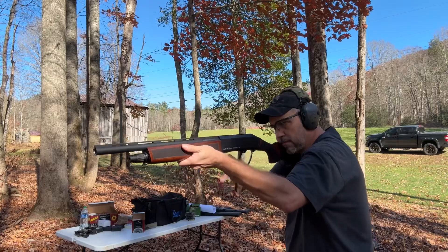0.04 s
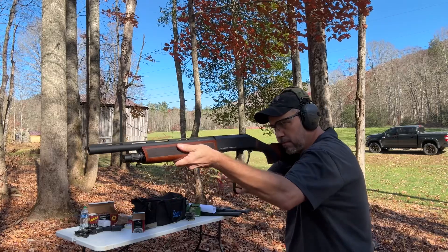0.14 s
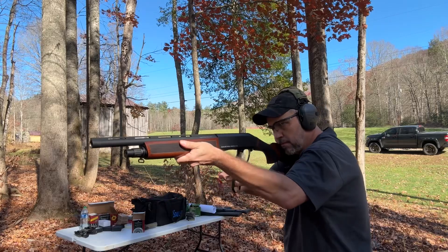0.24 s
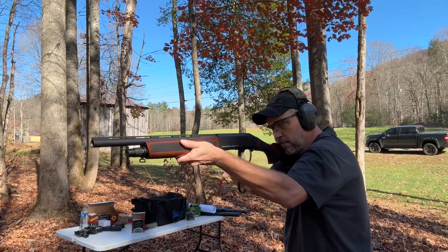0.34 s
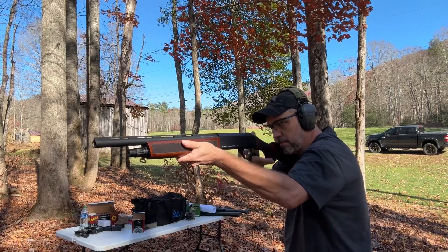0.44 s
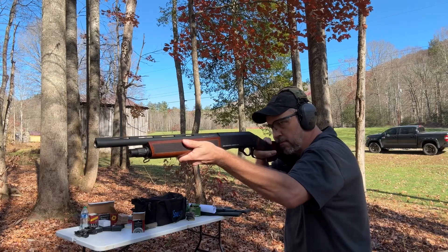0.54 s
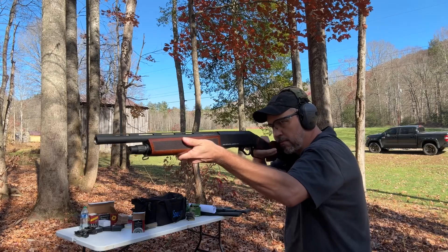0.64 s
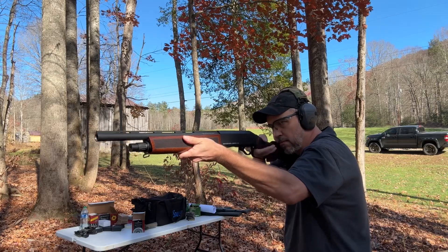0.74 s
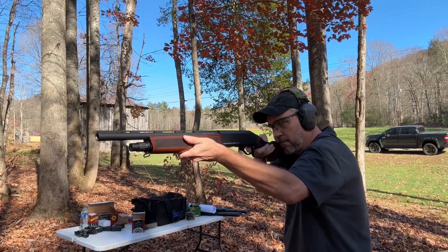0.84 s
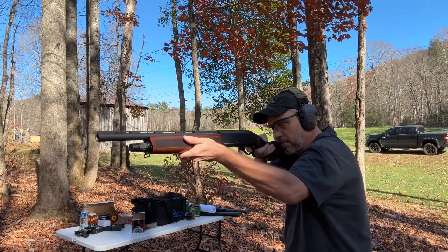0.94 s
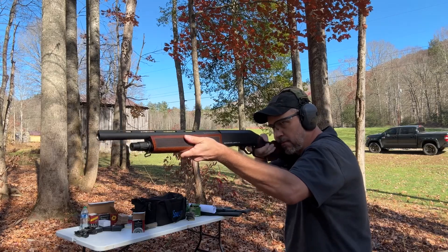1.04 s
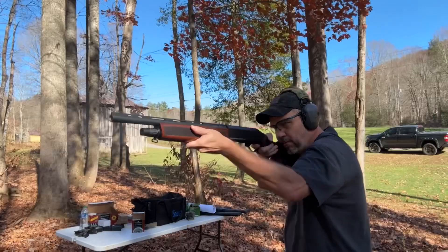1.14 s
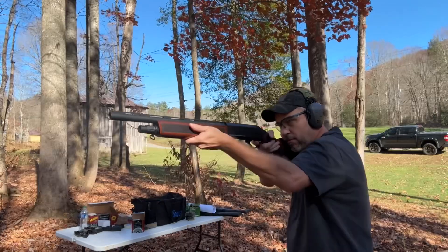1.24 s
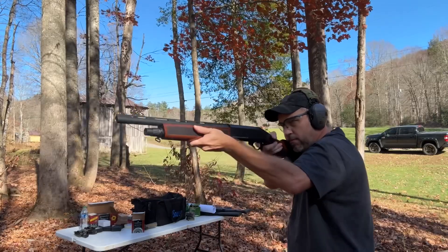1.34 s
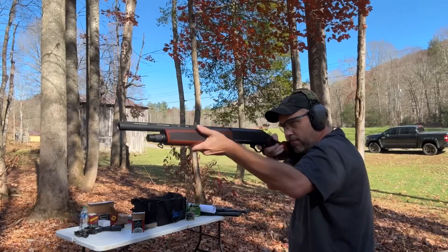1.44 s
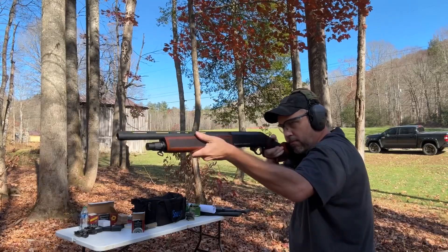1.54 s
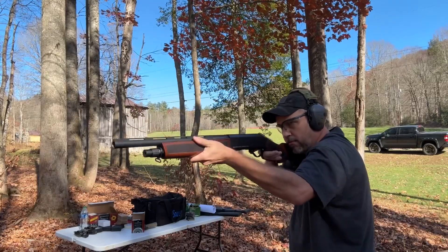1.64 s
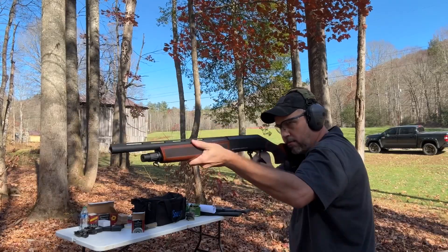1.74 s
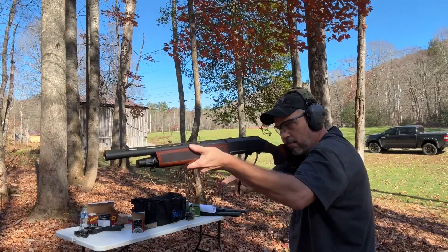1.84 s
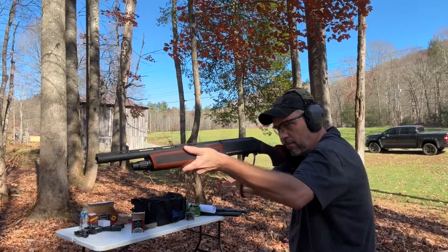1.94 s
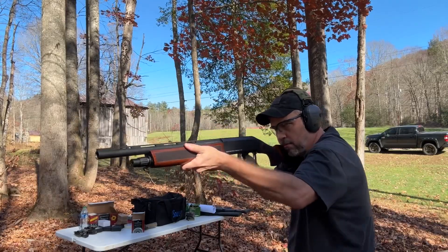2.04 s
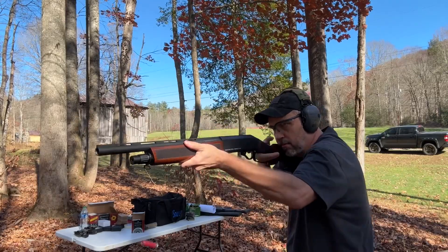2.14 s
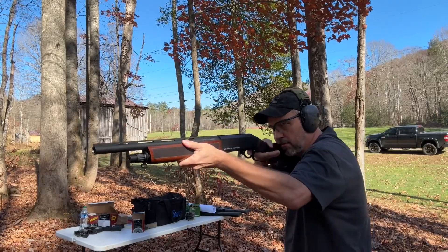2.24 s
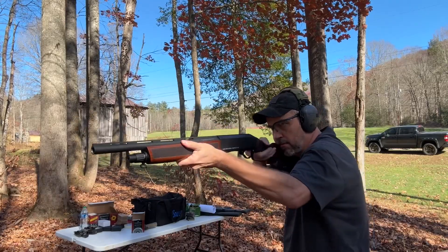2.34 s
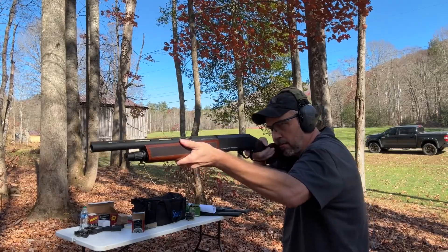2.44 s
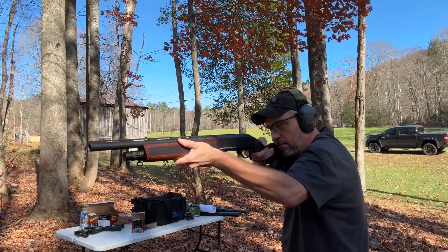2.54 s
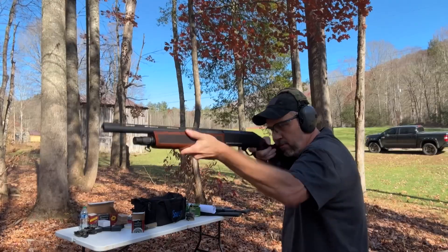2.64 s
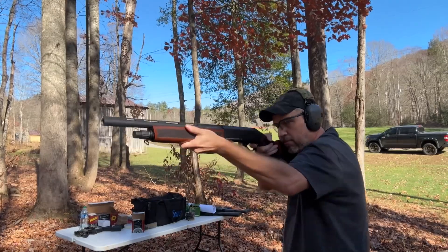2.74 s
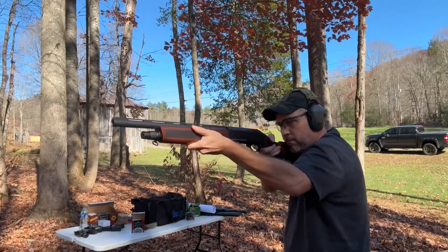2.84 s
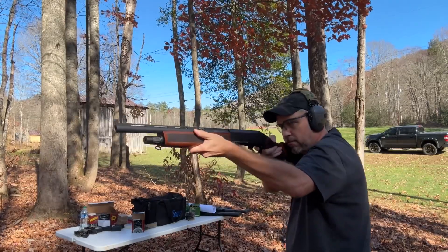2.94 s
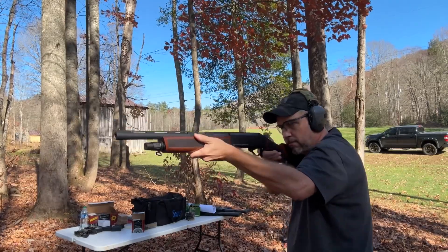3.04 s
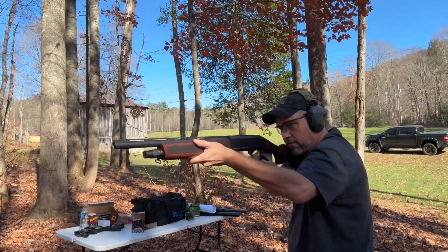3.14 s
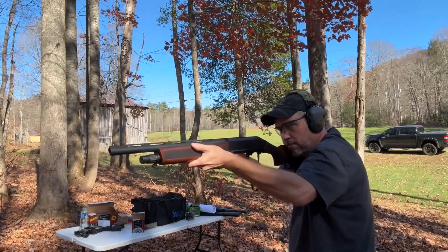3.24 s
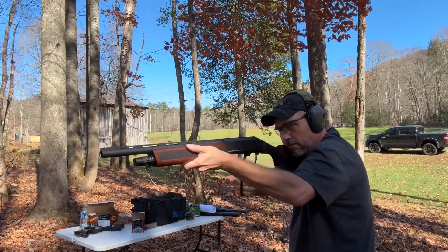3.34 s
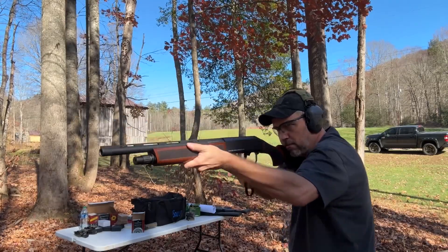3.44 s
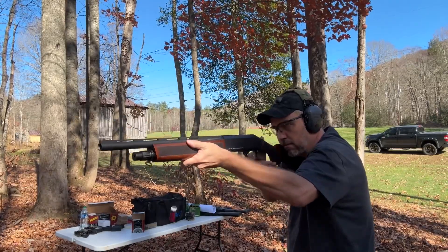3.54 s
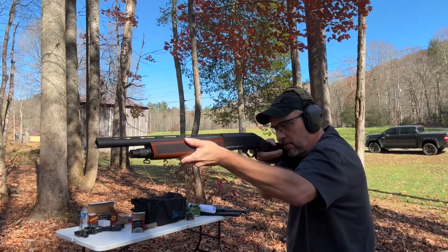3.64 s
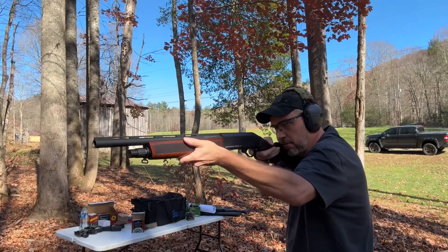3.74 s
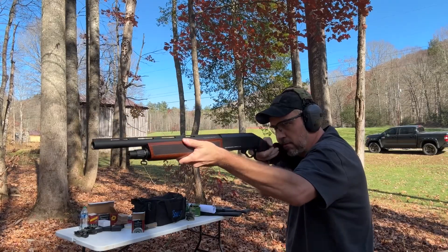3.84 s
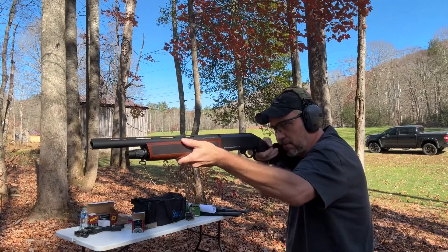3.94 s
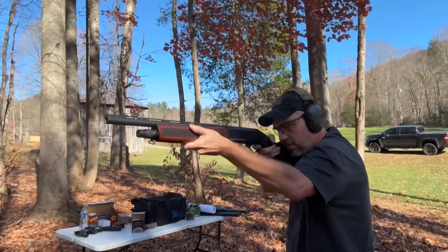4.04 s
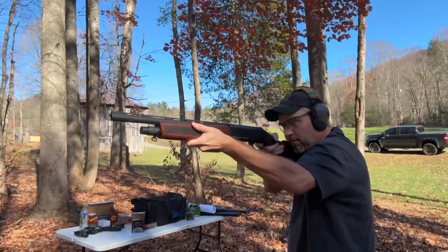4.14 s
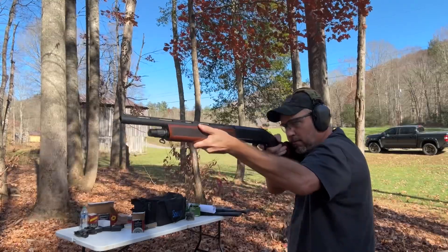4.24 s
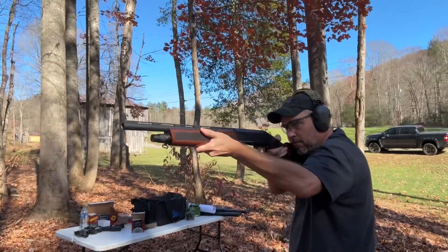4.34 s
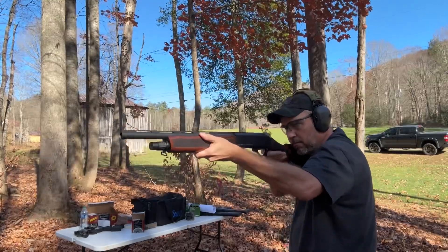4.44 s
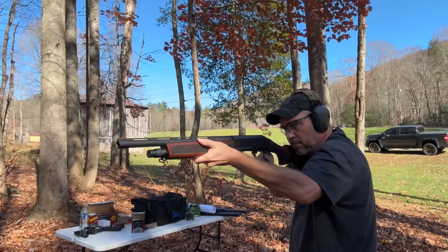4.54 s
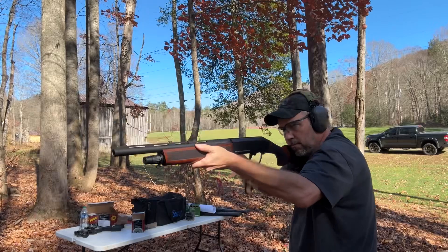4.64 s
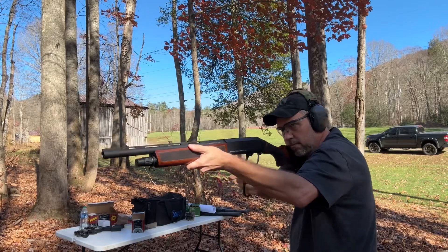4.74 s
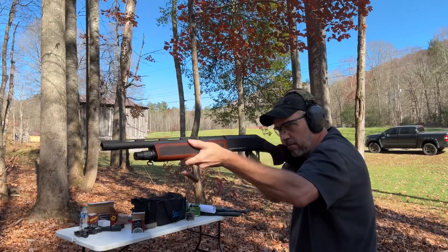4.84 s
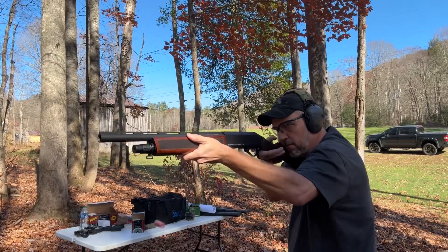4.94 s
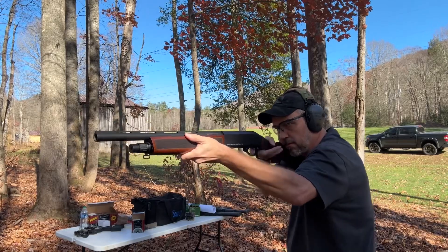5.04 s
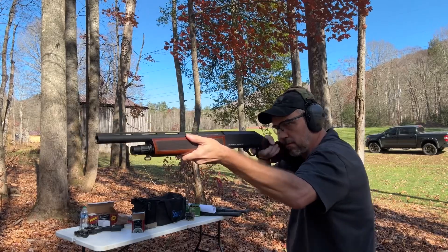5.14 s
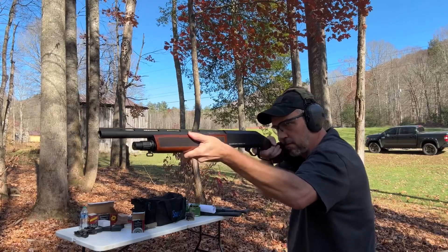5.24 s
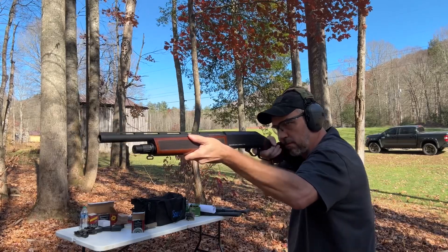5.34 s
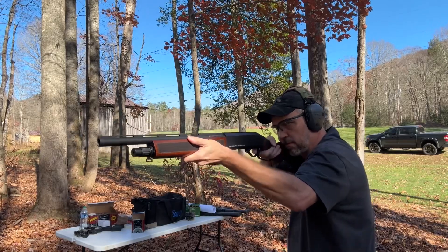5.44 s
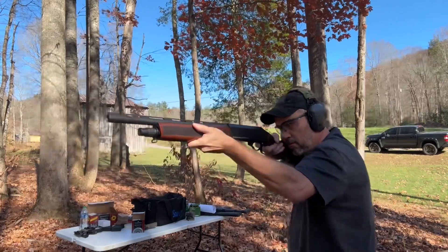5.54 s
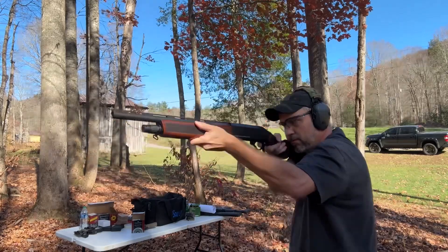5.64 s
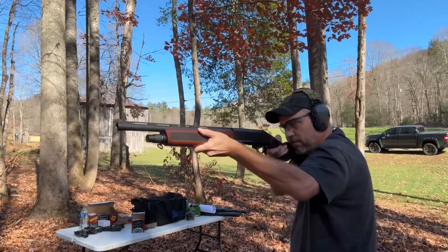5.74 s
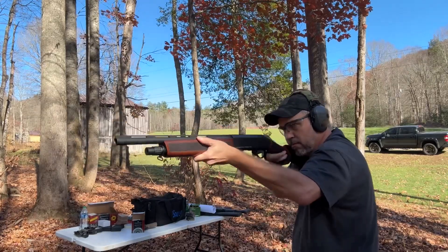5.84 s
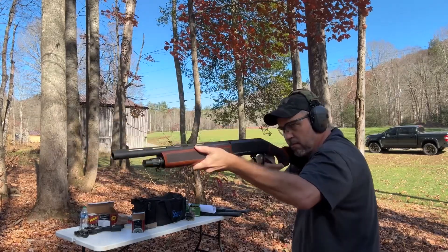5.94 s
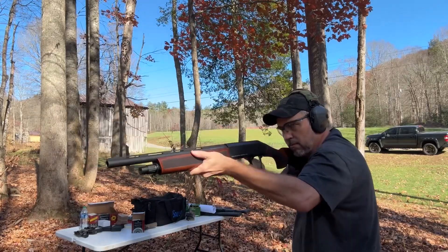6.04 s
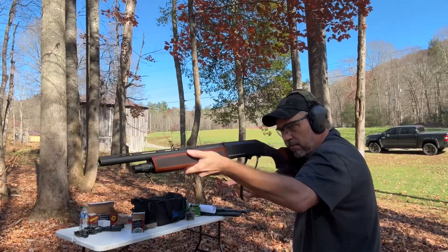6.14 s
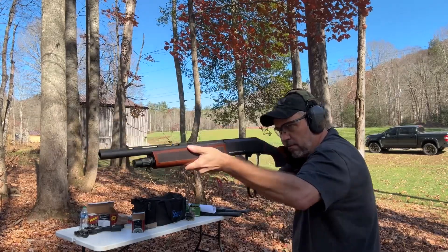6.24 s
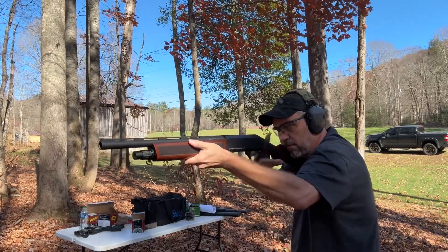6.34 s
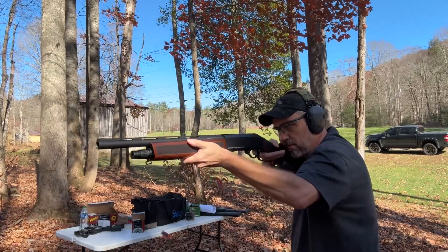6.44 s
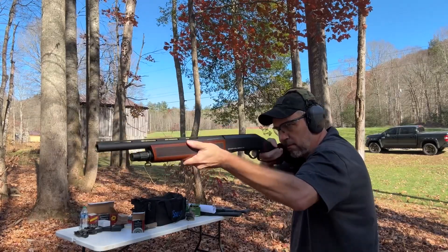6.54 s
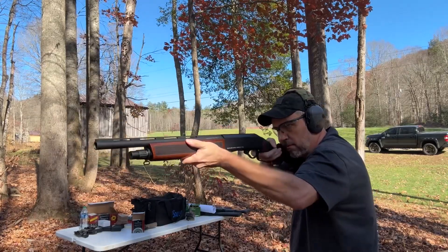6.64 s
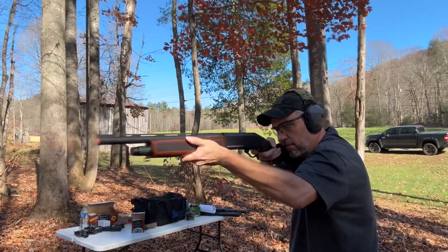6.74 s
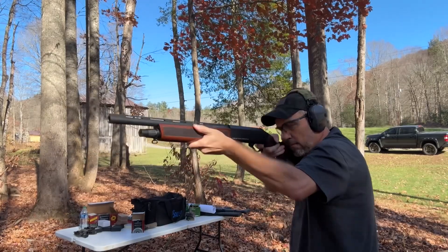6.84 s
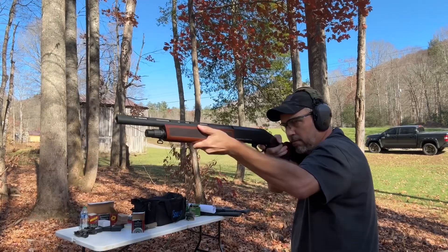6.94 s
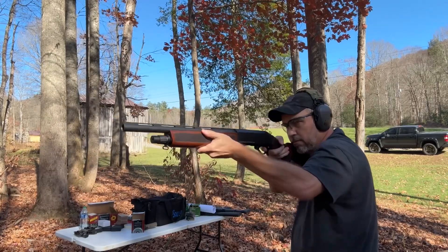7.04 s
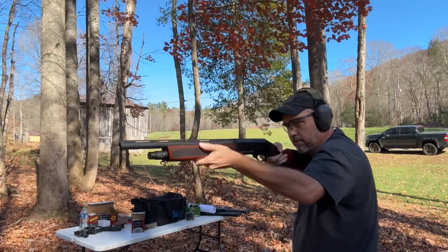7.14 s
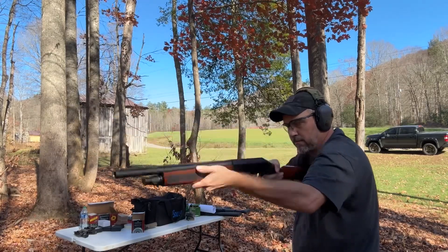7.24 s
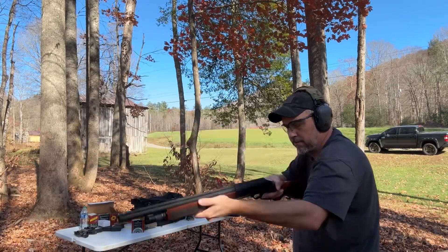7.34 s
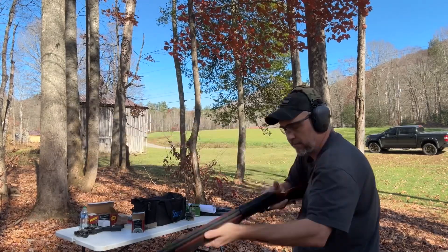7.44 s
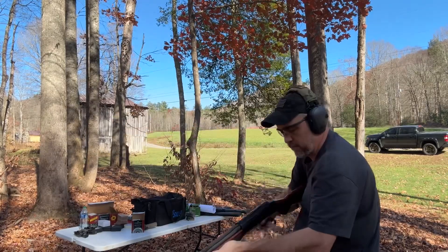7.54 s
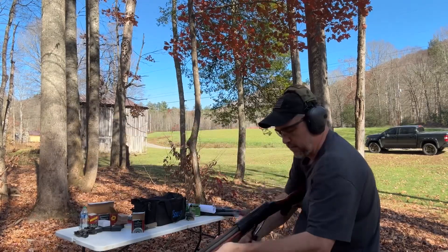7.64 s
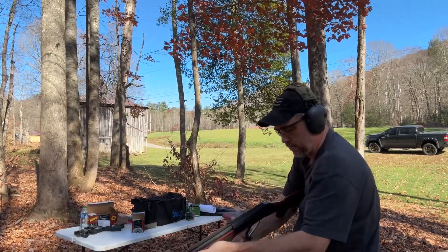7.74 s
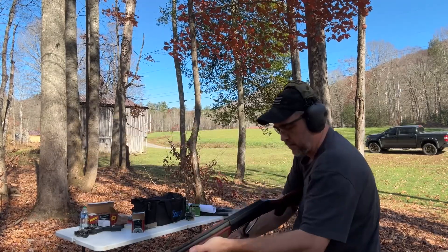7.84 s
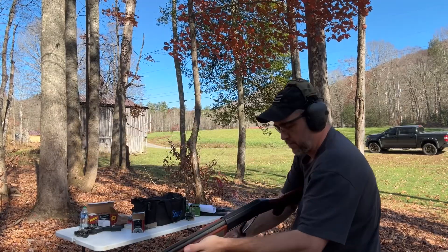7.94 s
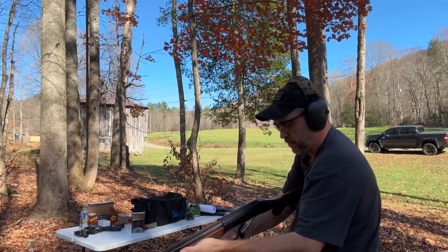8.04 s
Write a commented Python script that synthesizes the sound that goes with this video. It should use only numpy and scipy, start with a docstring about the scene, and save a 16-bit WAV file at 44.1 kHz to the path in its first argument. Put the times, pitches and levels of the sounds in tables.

```python
"""Five close shotgun blasts among bare trees at the edge of a valley, each with slaps, low throbs and a far roll.
Between shots a lever throws the bolt open and slams it shut; a steel part rings on after the slam.
Blasts are shaped noise with a low gliding tone, the throbs a wavering tone; the action is ticks, decaying modes
and rattle; the ring is two sine modes; growl, hiss and still air are modulated noise.
Everything but the ring and the low throb reaches two close microphone ports, partly alike and out of phase."""
import sys
import numpy as np
from scipy import signal
from scipy.fft import rfft, irfft, next_fast_len
from scipy.io import wavfile
from scipy.ndimage import uniform_filter1d, map_coordinates

SR = 44100
rng = np.random.default_rng(int(sys.argv[2]) if len(sys.argv) > 2 else 0)


def amplitude_ratio(level_db):
    """Convert a level in decibels to the matching linear amplitude (field) ratio."""
    exponent = np.asarray(level_db, float) / 20
    return 10 ** exponent


def generate_wav(signal):
    """Clip the signal to [-1, 1] and save it as 16-bit WAV at the path in sys.argv[1]."""
    frames = np.transpose(np.atleast_2d(signal))
    scaled = np.clip(frames, -1, 1) * 32767
    pcm = np.round(scaled).astype(np.int16)
    wavfile.write(sys.argv[1], SR, pcm)


N = 356442

# shots: t/s, pre-echo level just before the crack/dB, pre-echo rise per 60 dB/s, silent gap/s,
# crack level/dB, far echo level/dB, far echo slope/(dB/s)
SHOTS = [(1.131, -2.5, 0.023, 0.0048, -14.5, -10.5, 12), (2.634, -16.5, 0.13, 0.00026, -12, -1.5, 3),
         (3.999, -22, 0.061, 0.0013, -13, 0.6, -1), (5.4942, -27, 0.078, 0.00055, -17.5, 2.1, 0),
         (6.7776, -21, 0.033, .0005, -13.5, 2.56, -3.5)]
# blasts and valley at the two ports: f/Hz, likeness/0-1
ECHO_ALIKE = [(60, 0.75), (350, 0.8), (1000, 0.52), (2000, 0.099), (7500, 0.08), (8900, 0.91),
              (17000, 0.98)]
# blasts and valley at the two ports: f/Hz, left lead/rad
ECHO_LEAD = [(0, 0), (350, 1.5), (1000, 3.1), (3000, 6), (7000, 6.2), (9000, 9.38), (9900, 9.46),
             (11300, 12.52), (13000, 12.6), (14200, 15.66), (18000, 15.74)]


def unit(x):
    """Scales to rms 1."""
    return x / np.sqrt(np.mean(x ** 2) + 1e-20)


def along(points, hz):
    """Interpolates (f/Hz, value) points on a log frequency axis."""
    f, v = np.transpose(points)
    return np.interp(np.log(hz + 1), np.log(f + 1), v)


def level(tables):
    """Sums gains per sample from (t/s, level/dB) tables, each at -120 dB outside its span."""
    t = np.arange(N) / SR
    return sum(amplitude_ratio(np.interp(t, *np.transpose(rows), left=-120, right=-120)) for rows in tables)


def wobble(rate_hz):
    """Smooth random curve through rate_hz knots a second."""
    knots = rng.standard_normal(int(N * rate_hz / SR) + 4)
    return map_coordinates(knots, [np.arange(N) * rate_hz / SR])


def filtered(x, response):
    """Multiplies the spectrum of x by a function of frequency."""
    m = next_fast_len(x.shape[-1] + 8192)
    shaped = rfft(x, m) * response(np.fft.rfftfreq(m, 1 / SR))
    return irfft(shaped, m)[..., :x.shape[-1]]


def noise(spectrum, size=N):
    """Two unrelated coloured noises, rms 1 overall."""
    white = rng.standard_normal((2, size))
    return unit(filtered(white, lambda hz: amplitude_ratio(along(spectrum, hz))))


def ports(pair, alike, lead):
    """Mixes two unrelated signals into what two close ports hear: likeness and phase vary with frequency."""
    def same(hz):
        return np.clip(along(alike, hz), 0, 1)

    shared = filtered(pair[0], lambda hz: same(hz) * np.exp(-1j * np.interp(hz, *np.transpose(lead))))
    unshared = filtered(pair[1], lambda hz: np.sqrt(1 - same(hz) ** 2))
    return np.array([pair[0], shared + unshared])


def add(track, start_s, sound):
    """Mixes a sound into the track at start_s."""
    part = track[:, round(start_s * SR):][:, :sound.shape[1]]
    part += sound[:, :part.shape[1]]


def fade(t, t60):
    """Silence before 0, then an exponential fall of 60 dB per t60."""
    return (t >= 0) * amplitude_ratio(-60 * np.maximum(t, 0) / t60)


def shots():
    """Pre-echo noise smeared ahead of the crack, the crack, slaps off near trunks, then woods noise dying away."""
    # nearest trunks and ground: delay/s, level re crack/dB, t60/s
    trunks = [(.004, 0.5, 0.026), (.012, -8, .04), (0.038, -2.5, .04), (.058, -11, .05),
              (0.084, -26.5, .05), (.135, -48, 0.067)]
    # pre-echo spectrum: f/Hz, density/dB
    pre_echo = [(150, -9), (500, 0.5), (2500, -6), (8000, -14), (8800, -47.5)]
    # first milliseconds of the crack: f/Hz, density/dB
    snap = [(500, -21), (2000, 3), (6000, -4), (13000, 0), (16800, 0.5), (17600, -61.5)]
    # crack and slaps: f/Hz, density/dB
    crack = [(60, -26), (110, 5), (430, -5), (1500, -9.5), (4500, -20.5), (9500, -24), (13000, -33),
             (15500, -30), (17000, -72)]
    # woods spectrum: f/Hz, density/dB
    woods = [(40, -31), (75, -9), (120, -9), (230, -14), (460, 0.5), (940, -11.5), (4200, -20), (8200, -26),
             (12500, -26), (15600, -36.5), (16300, -66), (17000, -100)]
    # woods decay: f/Hz, t60 before the stretch/s
    woods_t60 = [(80, 0.24), (250, 0.73), (600, 0.57), (1500, 0.46), (3000, 0.44), (6000, 0.42),
                 (12000, 0.31)]
    woods_db, woods_t60_stretch = -16.5, 1.202

    out, t = np.zeros((2, N)), np.arange(SR) / SR
    lead_s = .03
    before = lead_s - t[:1400]  # time left to the crack
    for s, pre_echo_db, rise_s, gap_s, crack_db, *_ in SHOTS:
        swell = fade(before - gap_s, rise_s)
        edges = np.clip((before - gap_s) / 0.0016, 0, 1) * np.clip(t[:1400] / 0.024, 0, 1)
        add(out, s - lead_s, amplitude_ratio(pre_echo_db) * swell * edges * noise(pre_echo, size=1400))

        add(out, s, amplitude_ratio(crack_db + 2.0) * fade(t[:900], 0.025) * noise(snap, size=900))

        # the blast's push slides from 178 towards 58 Hz as the ground wave follows
        glide = 2 * np.pi * np.cumsum(58 + 120 * np.exp(-t / 0.017)) / SR
        push = t / 0.021 * np.exp(1 - t / 0.013)
        add(out, s, amplitude_ratio(crack_db - 4.5) * push * np.sin([glide, glide - 1.3]))

        slaps = fade(t, 0.057) + sum(amplitude_ratio(db) * fade(t - delay, t60) for delay, db, t60 in trunks)
        add(out, s, amplitude_ratio(crack_db) * slaps * noise(crack, size=SR))

        hz, frame_s, z = signal.stft(noise(woods, size=SR), SR, nperseg=512)
        # clumps of trunks answer unevenly in pitch (axis 0) and time (axis 1)
        clumps = uniform_filter1d(rng.standard_normal(z.shape[1:]), size=14, axis=0)
        clumps = unit(uniform_filter1d(clumps, size=4, axis=1))
        decay = fade(frame_s, woods_t60_stretch * along(woods_t60, hz)[:, None])
        tail = signal.istft(z * amplitude_ratio(1.7 * clumps) * decay, SR, nperseg=512)[1][:, :SR]
        add(out, s, amplitude_ratio(woods_db) * tail * (1 - np.exp(-t / 0.0044)) * (1 - t))
    return ports(out, ECHO_ALIKE, ECHO_LEAD)


def throbs():
    """Low throbs around 51 Hz after each blast, likely wind or the microphone diaphragm; rumble, late dull slaps."""
    # throbs: t of the peak/s, level/dB, half width of the fall/s
    swells = [(1.135, -27, 0.018), (1.256, -38, 0.028), (1.366, -44.5, 0.1), (2.652, -28.5, 0.02),
              (2.69, -25, .035), (2.751, -21, 0.034), (2.865, -38, 0.081), (2.92, -43, 0.04),
              (2.97, -50, .04), (4.036, -17.5, .035), (4.14, -28.5, 0.045), (4.24, -34, 0.087),
              (4.32, -45, .045), (5.519, -22.5, 0.025), (5.585, -20, 0.038), (5.715, -32.5, 0.076),
              (5.86, -50, 0.088), (6.85, -28.5, 0.052), (6.91, -31, 0.02), (6.975, -27.5, 0.072),
              (7.115, -48, .11), (7.39, -61.5, .1)]
    # late slaps: t of the peak/s, level/dB
    late_slaps = [(2.95, -41.5), (4.298, -32), (5.795, -35)]
    slap_width_s = 0.02
    edge_db, rise_over_fall = 9, 0.37  # drop at the half width; rise time over fall time
    tail_db, tail_t60_s = -20.5, 0.22  # weak tail after each throb
    rumble_shape = [(40, -31.0), (75, 1), (125, 0), (190, -35), (400, -89.5)]  # f/Hz, density/dB

    t = np.arange(N) / SR

    def hump(s, db, width):
        side = np.where(t < s, rise_over_fall * width, width)
        return amplitude_ratio(db - edge_db * ((t - s) / side) ** 2)

    swell = sum(hump(s, db, width) + amplitude_ratio(db + tail_db) * fade(t - s, tail_t60_s) for s, db, width in swells)
    swell = uniform_filter1d(swell, size=400)
    phase = 2 * np.pi * np.cumsum(51 + 6 * wobble(22)) / SR
    skew = .35 + .3 * wobble(9)  # rad, opposite in the two channels
    throb = np.sin([phase + skew, phase - skew])
    thumps = sum(hump(s, db, slap_width_s) for s, db in late_slaps)
    rumble = ports(noise(rumble_shape), ECHO_ALIKE, ECHO_LEAD)
    return swell * throb + (0.15 * swell + thumps) * rumble


def strokes(pattern, rows):
    """Plays one contact pattern per stroke at its own time, level and pace; only the approach is stretched."""
    return [(s + (slow * lead if lead < 0 else lead), db + rel_db, *rest)
            for s, db, slow in rows for lead, rel_db, *rest in pattern]


def action():
    """Each contact ticks, rings the receiver, knocks the stock and rattles; the bolt scrapes in dense grains."""
    # other steel contacts, trigger, latch, handling:
    # t/s, relative level/dB, relative body level/dB, favoured ring f/Hz, t60/s
    contacts = [(0.001, -17, -16, 1460, 0.08), (0.012, -7, -5.5, 2087, 0.1),
                (0.0371, -12.5, -8.5, 2140, 0.14), (0.0556, -14, -7.5, 2160, 0.066),
                (0.0815, -15.5, -5, 4335, 0.078), (0.2273, -50, -30, 2560, 0.06),
                (0.342, -47, 10.5, 1382, 0.064), (0.383, -49.5, 16, 2070, 0.11),
                (0.4187, -17.5, -4, 2140, 0.085), (0.4351, -16.5, 4.5, 1840, 0.095),
                (0.4597, -21.5, 1, 1267, 0.093), (0.5117, -23, 9, 1390, 0.017),
                (0.522, -29.5, 4.5, 1373, 0.067), (0.7856, -52, -16, 1400, 0.044),
                (0.8099, -50.5, -12, 1380, 0.05), (0.8535, -50.5, -5.5, 1370, 0.034),
                (1.726, -47, -7, 1010, 0.061), (1.7482, -41.5, -1.5, 1760, 0.11),
                (2.0508, -50, -7, 1250, 0.052), (2.4548, -36, -1.5, 2560, 0.044),
                (3.1492, -42, -3.5, 1077, 0.15), (3.92, -43, -7.5, 1245, 0.076),
                (4.5238, -44, -3.5, 1680, 0.23), (4.5546, -38, -17, 2650, 0.066),
                (4.8478, -48, -15, 1160, 0.057), (5.2849, -48.5, -20, 1290, 0.068),
                (5.9436, -40, -13, 1340, 0.065), (5.966, -46, -6, 1070, 0.075),
                (6.0991, -31.5, -28.5, 1860, 0.11), (6.7431, -44.5, -6, 3080, 0.15),
                (7.5469, -43.5, -2, 1210, 0.045), (7.5544, -37.5, -18, 1137, 0.064),
                (7.561, -32, -20.5, 2680, 0.078), (7.6071, -38, -25.5, 4770, 0.088),
                (7.6275, -41, -18, 1820, 0.041), (7.6374, -45, -9, 1174, 0.2),
                (7.669, -36.5, -22, 2830, 0.023), (7.7273, -49, -19, 4310, 0.017),
                (7.7538, -50, -15.5, 4300, 0.024), (7.7962, -41, -30, 4340, 0.018)]
    # contacts of an opening stroke: t from the stop/s, then as contacts
    opening = [(-.032, -10, -23.5, 3670, 0.071), (0, -1, -25, 1490, 0.13), (.0115, -3.5, -13, 3700, .085),
               (.029, -6, -6, 1300, 0.047)]
    # contacts of a closing stroke: t from the stop/s, then as contacts
    closing = [(-.077, -17, -2.5, 1690, 0.2), (-.056, -15.5, -8, 1897, .09), (-.031, -17, 2.9, 1700, 0.11),
               (-.0066, -14.5, 2.5, 1708, .07), (0, 0.3, -8.5, 1700, .055),
               (.006, -4.5, -17.5, 1784, 0.072)]
    # opening strokes: t of the stop/s, relative level/dB, slowness of the approach/1
    opens = [(1.8366, -30, 0.76), (3.2789, -26.5, 0.79), (4.6529, -28.5, .84), (6.1059, -27, .8)]
    # closing strokes: t of the stop/s, relative level/dB, slowness of the approach/1
    closes = [(0.4846, -6.5, 1.05), (2.1509, -26, 1.01), (3.5977, -28, 1.13), (4.9443, -27.5, .99),
              (6.3867, -24.5, 1.1)]
    # receiver modes: f/Hz, relative level/dB, longest t60/s
    steel = [(770, -6, .04), (1300, -5, .04), (1510, -5, .035), (1820, -2, .03), (2170, -4, .03),
             (2830, -5, .04), (3400, -7, .035), (3760, -5, .04), (4330, -4, .03), (5400, -7, .03),
             (5800, -6, .05), (7330, -6, .04), (11800, -8, .05), (12950, -5, .04)]
    # tick, rattle and scrape: f/Hz, density/dB
    clack = [(90, -49.5), (170, -17.5), (580, -6.5), (1200, -9.5), (1700, -7), (2400, -7), (4300, -5.5),
             (9500, -11), (12900, -8.5), (15500, -19.5), (17000, -74.5)]
    # trees answering the action: f/Hz, density/dB
    yard = [(300, -11), (1200, -7), (3500, -4), (8000, -7.5), (14000, -16), (16000, -56)]
    # action at the two ports: f/Hz, likeness/0-1
    gun_alike = [(60, 0.41), (1200, 1), (2500, 0.36), (5500, 0.069), (7500, 0.12), (8900, 0.84),
                 (17000, 0.93)]
    # action at the two ports: f/Hz, left lead/rad
    gun_lead = [(0, 0), (1500, 0), (2700, -.9), (4000, 0), (7200, 0), (9000, 3.1), (9900, 3.18),
                (11300, 6.24), (13000, 6.32), (14200, 9.38), (18000, 9.46)]
    stock = [(300, -28.5), (900, 1.5), (1800, -1), (2800, -11.5), (5000, -40.5)]  # f/Hz, density/dB
    slide_s, slide_db, slide_rise_db = .12, -36.5, 15.5  # slide_s is stretched by slowness
    slide_fall_s, slide_fall_db = 0.09, 23
    onset_s = .0007

    ticks, rattle, t = np.zeros((2, N)), np.zeros((2, N)), np.arange(SR // 5) / SR
    hz, mode_db, mode_t60 = np.transpose(steel)[:, :, None]
    grit = amplitude_ratio(0.83 * wobble(350) + 1.5 * wobble(51))
    soft = 1 - np.exp(-t / onset_s)
    for s, db, body_db, near_hz, t60 in contacts + strokes(opening, opens) + strokes(closing, closes):
        chance = rng.standard_normal((2, len(steel), 2))  # level and phase per port and mode
        # where the blow lands picks the mode that rings most
        favour_db = 11 * np.exp(-(np.log(hz / near_hz) / .12) ** 2)
        struck_db = mode_db + 4 * chance[..., :1] + favour_db
        modes = np.sin(2 * np.pi * hz * t + 3 * chance[..., 1:])
        ring = amplitude_ratio(struck_db) * fade(t, np.minimum(mode_t60, t60)) * modes
        tick = fade(t, .012) * (1 - np.exp(-t / .0003)) * noise(clack, size=len(t))
        knock = amplitude_ratio(body_db - 9.5) * fade(t, .7 * t60) * noise(stock, size=len(t))
        loose = 0.42 * fade(t, t60) * noise(clack, size=len(t))
        add(ticks, s - onset_s, amplitude_ratio(db - 3) * (.75 * tick + soft * .22 * ring.sum(axis=1)))
        add(rattle, s - onset_s, amplitude_ratio(db - 2.5) * soft * (loose + knock))

    # the bolt scrapes louder up to its stop
    slides = [[(s - slow * slide_s, db - slide_rise_db), (s, db), (s + slide_fall_s, db - slide_fall_db)]
              for s, db, slow in opens + closes]
    scrape = uniform_filter1d(level(slides), size=600) * amplitude_ratio(slide_db) * unit(grit * noise(clack))
    direct = ticks + rattle * amplitude_ratio(4.2 * wobble(500)) + scrape

    later = np.arange(SR // 2) / SR
    answer = fade(later - .01, 0.36) * noise(yard, size=len(later))
    wet = signal.fftconvolve(direct[:1], answer / np.linalg.norm(answer[0]), axes=1)[:, :N]
    return ports(direct + amplitude_ratio(-22.0) * wet, gun_alike, gun_lead)


def ringing():
    """Two clean decaying modes of a loose steel part, gated on and off, slightly louder at the left port."""
    # rings: start/s, stop/s, relative low mode level/dB, relative high mode level/dB, high mode t60/s
    rings = [(0.526, 0.715, -90, -54, 1.7), (0.492, 1.119, -55.5, -68.5, 5.2),
             (2.158, 2.606, -92.5, -65, 2.4), (3.597, 3.984, -84, -71, 2.5), (4.95, 5.483, -92.5, -80, 4),
             (6.391, 6.732, -73, -59, 1.06)]
    # low and high mode: f/Hz
    ring_hz = (1382, 3850)
    low_t60_s = 4.9

    t, out = np.arange(N) / SR, 0
    low, high = np.sin(2 * np.pi * np.outer(ring_hz, t))
    for start, stop, low_db, high_db, high_t60 in rings:
        gate = np.clip(np.minimum(t - start, stop - t) / 0.0075, 0, 1)
        low_part = amplitude_ratio(low_db) * fade(t - start, low_t60_s) * low
        high_part = amplitude_ratio(high_db) * fade(t - start, high_t60) * high
        out = out + gate * (low_part + high_part)
    return out * amplitude_ratio([[1.2], [-1.2]])  # left, right/dB


def valley():
    """Far slopes keep a dull, lumpy growl and a faint hiss rolling; still air lies under it."""
    # the same slopes answer every shot: t after the shot/s, relative growl level/dB, relative hiss level/dB
    slopes = [(0.041, -53.5, -64.5), (0.101, -56, -57), (0.141, -38.5, -52), (0.188, -56, -47),
              (.25, -38, -40), (.33, -44, -45), (.42, -40, -50), (.51, -44, -52), (.57, -49, -54.5),
              (.66, -49.5, -56.5), (.75, -52, -59.5), (1.0, -56.5, -65), (1.301, -59, -78),
              (2.199, -80.5, -88)]
    # growl spectrum: f/Hz, density/dB
    growl_shape = [(24, -45.5), (40, -19), (183, -20), (215, -15), (302, -4), (483, -0.5), (576, -3),
                   (650, -9), (754, -10), (910, -21), (1000, -14.5), (1300, -47), (2200, -120)]
    # hiss spectrum: f/Hz, density/dB
    hiss_shape = [(410, -24.5), (700, -8), (914, -0.5), (2580, -11), (6130, -29.5), (8350, -33.5),
                  (9000, -63), (11700, -87), (19800, -120)]
    # still air: f/Hz, density/dB
    air_shape = [(20, -26.5), (60, -10.5), (500, -1), (1300, -7.5), (2800, -4.5), (8000, -16.5),
                 (12000, -12), (14500, -28), (16000, -73)]
    # steady levels until the first shot; drop_db is added from then on
    calm_growl_db, calm_hiss_db, air_db, drop_db = -78, -66, -69, -14.5

    after, growl_db, hiss_db = np.transpose(slopes)

    def roll(db):
        return level([np.transpose([s + after, echo_db + slope * after + db])
                      for s, *_, echo_db, slope in SHOTS])

    flicker = amplitude_ratio(1.6 * wobble(8) + 2.5 * wobble(45))
    lumps = .9 * wobble(16)
    calm = amplitude_ratio(np.where(np.arange(N) / SR < SHOTS[0][0], 0, drop_db))
    growl = (roll(growl_db) + calm * amplitude_ratio(calm_growl_db)) * amplitude_ratio(lumps) * noise(growl_shape)
    hiss_gain = amplitude_ratio(0.88 * lumps + 1.3 * wobble(23))
    hiss = (roll(hiss_db) + calm * amplitude_ratio(calm_hiss_db)) * hiss_gain * noise(hiss_shape)
    air = calm * amplitude_ratio(air_db) * flicker * noise(air_shape)
    return ports(growl + hiss + air, ECHO_ALIKE, ECHO_LEAD)


def scene():
    """Sums gun, woods, throbs and valley."""
    return shots() + throbs() + action() + ringing() + valley()


def roll_off(x):
    """The treble ends steeply here."""
    return signal.sosfilt(signal.butter(12, 17850, fs=SR, output="sos"), x)


def record(dry):
    """Deep bass and top treble roll off and the peaks saturate softly."""
    # microphone response: f/Hz, gain/dB
    mic = [(16000, 2.5), (17300, -4.5), (17800, -72.5)]
    x = filtered(dry, lambda hz: amplitude_ratio(along(mic, hz)))
    x = signal.sosfilt(signal.butter(2, 30, 'high', fs=SR, output='sos'), x)
    x = x / (1 + np.abs(x / .95) ** 6) ** (1 / 6)
    return roll_off(x)


dry = scene()
out = record(dry)
generate_wav(out)
```